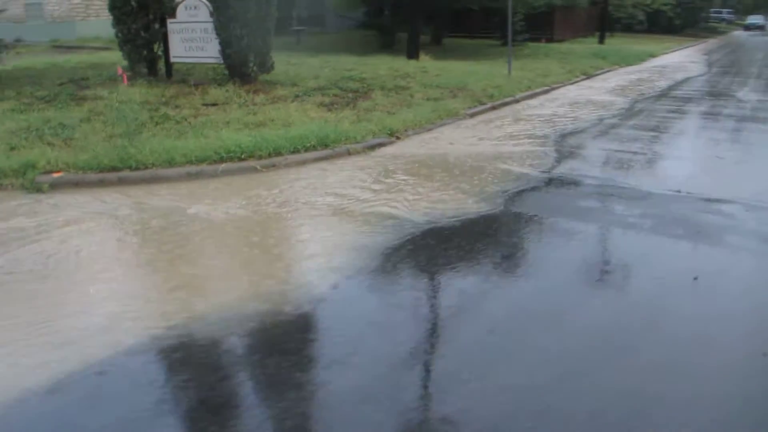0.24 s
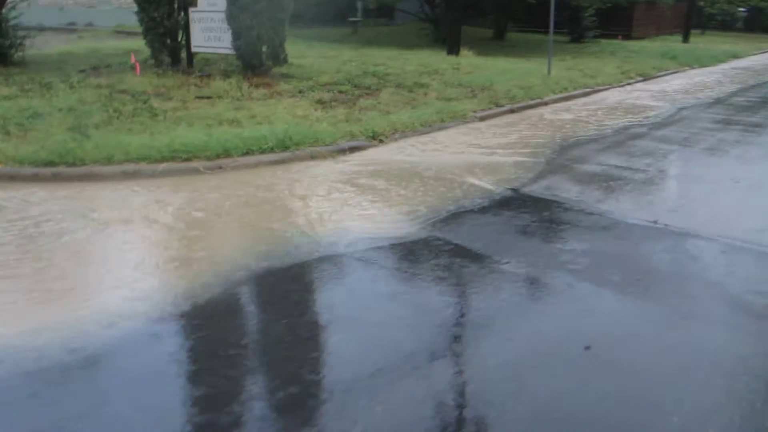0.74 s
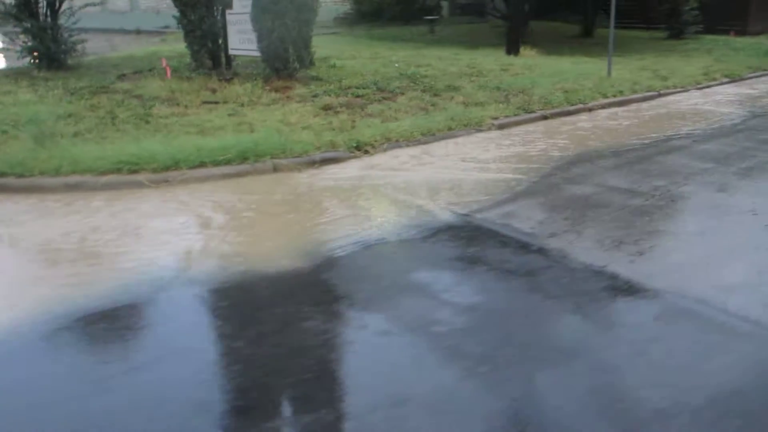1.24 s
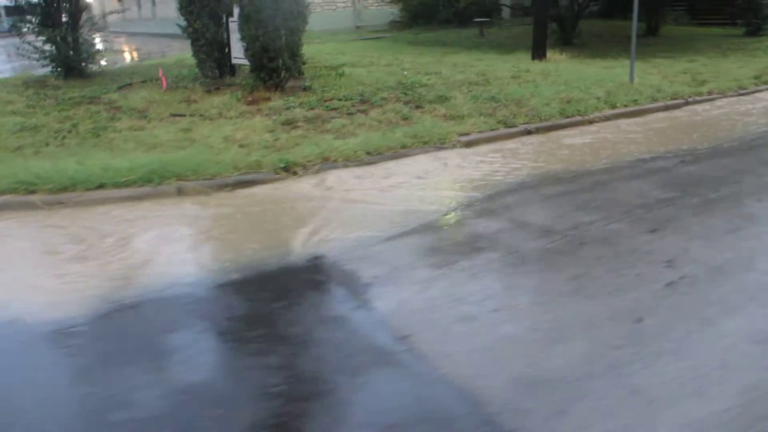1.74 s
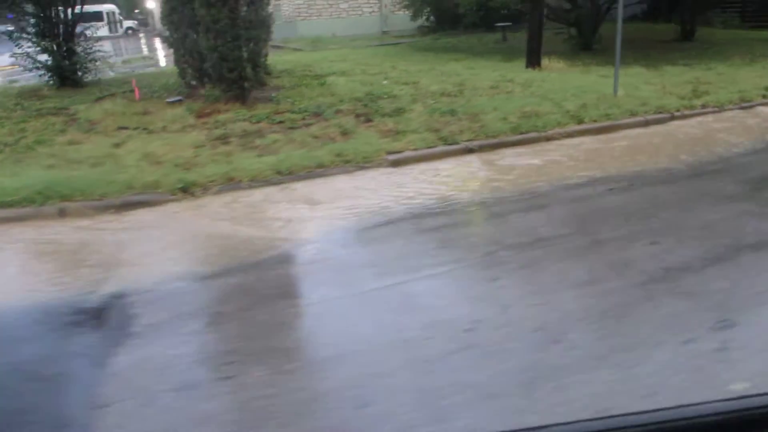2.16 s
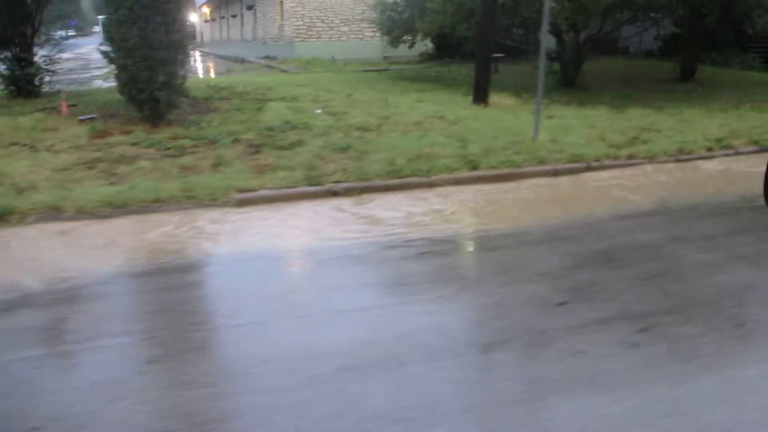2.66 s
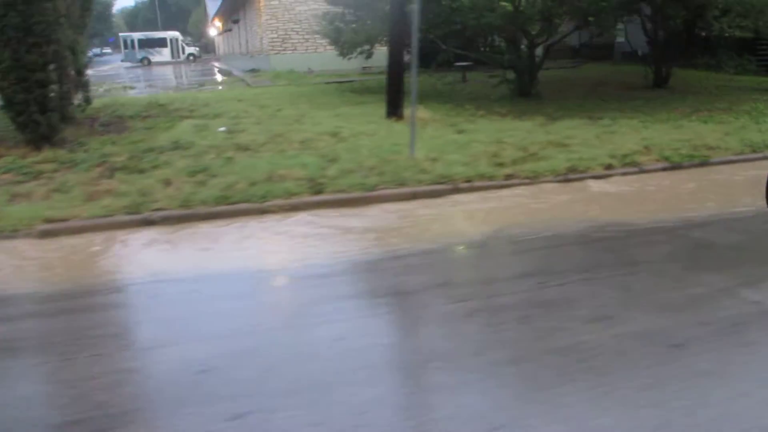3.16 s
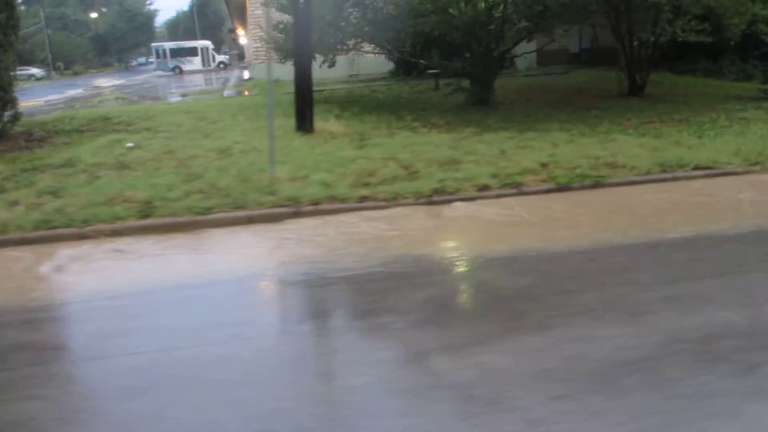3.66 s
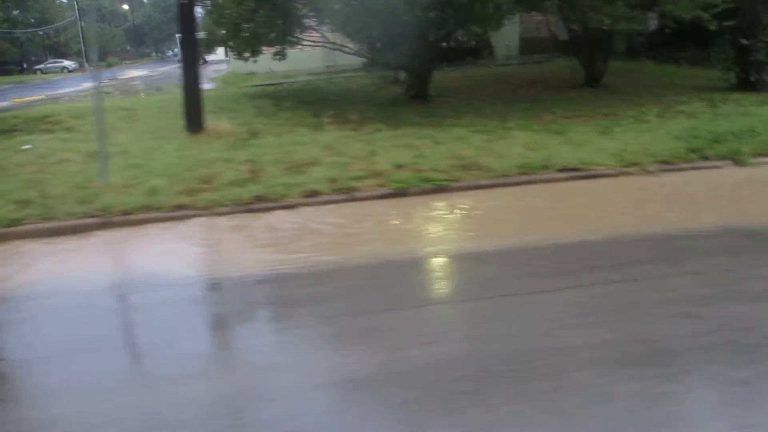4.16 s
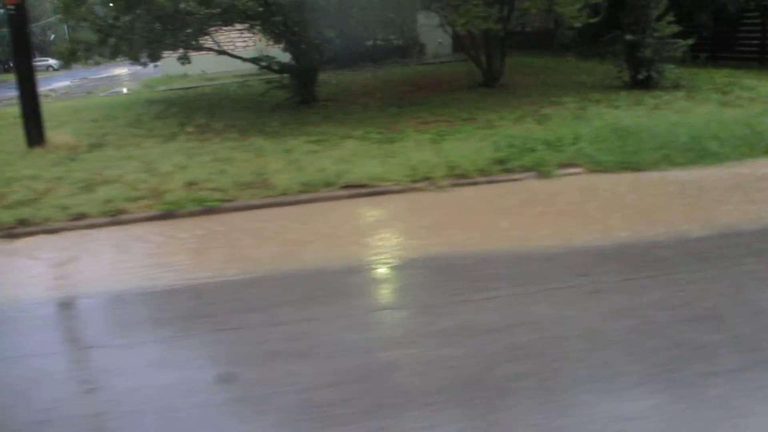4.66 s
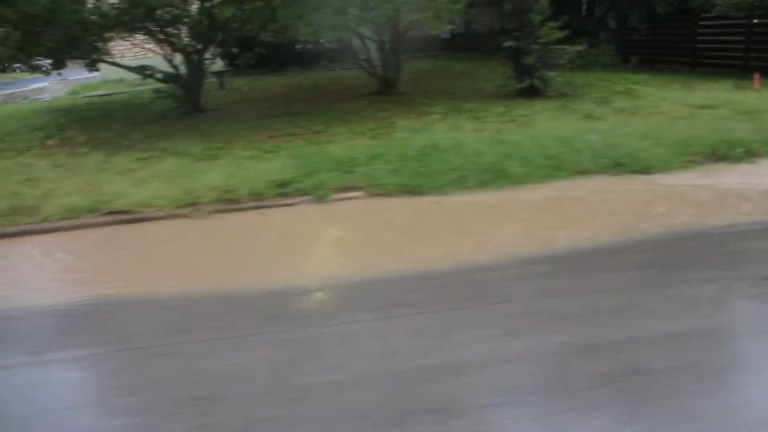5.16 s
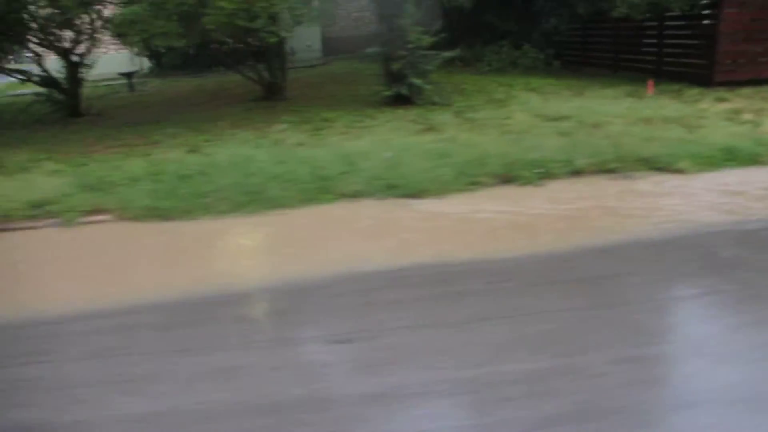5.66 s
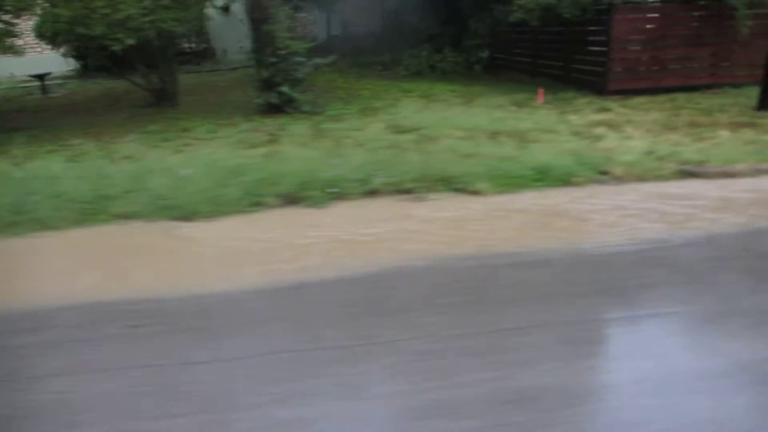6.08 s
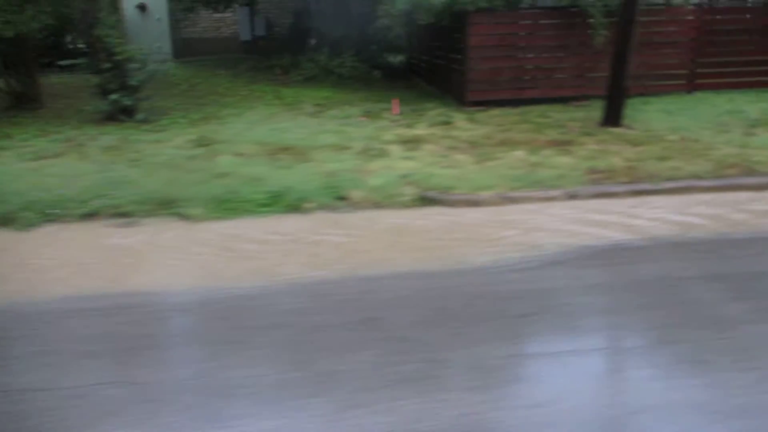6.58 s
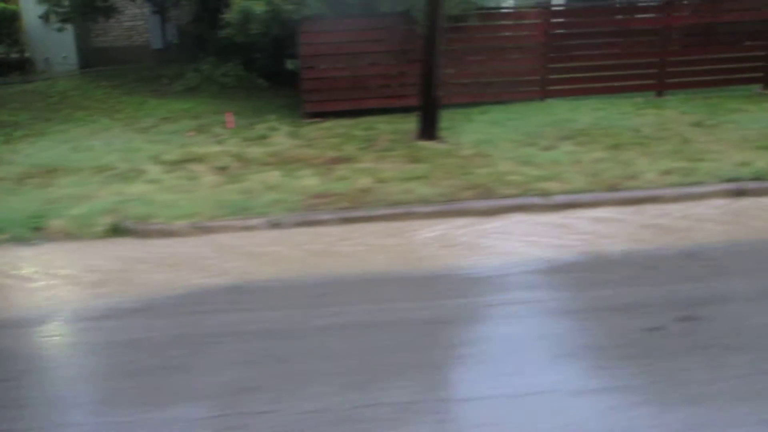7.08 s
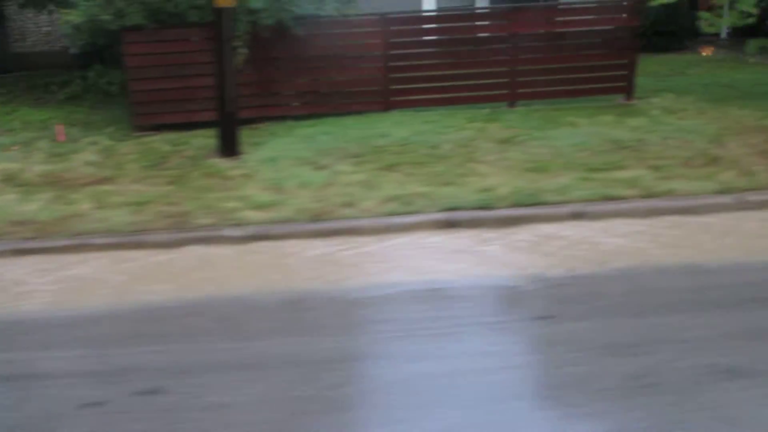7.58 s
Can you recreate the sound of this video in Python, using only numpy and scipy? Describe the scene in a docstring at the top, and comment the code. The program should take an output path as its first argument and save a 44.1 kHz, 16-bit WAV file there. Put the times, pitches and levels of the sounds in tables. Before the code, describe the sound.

Heard from inside a moving car in the rain, a low engine drone rises steadily over deep road rumble and the wash of shallow water under the tyres. Fine drops patter, with small ticks and splashes. Wipers knock softly at an even pace, bumps boom, and a hollow tap comes early. The engine eases briefly near the middle, pulls again, then drops quickly in pitch late on as the throttle lifts. The sound leans to the right.

```python
"""Inside a car driving along a flooded street in steady rain, heard by two microphone ports.
From the start the engine, a few sine tones and gas noise, rises in pitch, easing briefly near 3 s.
All along, noise makes the tyres' rumble and spray; short bursts make the rain, ticks and splashes.
The wipers knock at each turn from 0.18 s, bumps boom, and a tap on the trim comes at 0.74 s.
Heavy drops snap close by at 0.8 and 5.76 s; after 6 s the throttle lifts and the pitch falls."""
import sys
import numpy as np
from scipy import signal
from scipy.fft import rfft, irfft
from scipy.io import wavfile
from scipy.ndimage import uniform_filter1d

SR = 44100
rng = np.random.default_rng(int(sys.argv[2]) if len(sys.argv) > 2 else 0)


def generate_wav(sig):
    """Save sig (samples, or channels by samples) to the path in sys.argv[1] as 16-bit PCM at SR."""
    pcm = np.round(np.clip(np.atleast_2d(sig).T, -1, 1) * 32767).astype(np.int16)
    wavfile.write(sys.argv[1], SR, pcm)


N = 344862
TIME = np.arange(N) / SR

# The two microphone ports:
# (frequency [Hz], likeness of the two sides [0-1], left lead [rad], left minus right [dB])
PORTS = [(60, 1, 3.37, -8.5), (273, 0.99, 3.56, -9.5), (503, 0.81, 2.88, -8.5), (780, 0.87, 1.77, -11),
         (1400, 0.49, 2.6, -10.5), (2180, 0.58, 2.07, -8), (4000, 0.38, 0.42, -10), (8040, 1, 1.67, -13),
         (11500, 0.8, 1.22, -9.5), (15000, .5, 1.5, -8)]
# Slow changes of the road surface:
# (time [s], body rumble [dB], tread roar [dB], water wash [dB], fine spray [dB])
SURFACE = [(0, -27, -35.5, -40, -54.5), (1.8, -24.5, -34.5, -38.5, -56), (3.1, -24.5, -33.5, -39, -54.5),
           (4.4, -24, -35.5, -38, -57.5), (5.7, -22.5, -41.5, -37.5, -58), (6.45, -25.5, -37.5, -38.3, -57),
           (7.2, -27, -43, -37, -59), (7.82, -25, -40.5, -36, -55.8)]

# Larger drops on the glass: (time [s], level before the fade [dB], centre [Hz])
TICKS = [(.6213, -34, 9000), (1.2107, -26, 11500), (2.273, -32, 12000), (2.5833, -34, 9000),
         (2.6563, -27, 11000), (3.349, -31, 9000), (3.9722, -34, 9500), (4.5768, -37, 11000),
         (6.3367, -26.5, 9800)]
# Puddle water thrown at the underside:
# (time [s], level before the fade [dB], centre [Hz], time to fade by 60 dB [s])
SPLASHES = [(.163, -41, 1600, .06), (.286, -40.5, 1900, 0.052), (.842, -44.5, 1900, 0.23),
            (.93, -39, 1450, 0.15), (.953, -34, 2200, 0.031), (1.695, -35, 1350, 0.17),
            (1.762, -35, 1500, 0.038), (2.033, -30, 1220, .05), (2.544, -37, 2450, 0.028),
            (4.229, -31.5, 1650, .02)]
# Heavy drops beside the ports: (time [s], peak before the bass is cut [dB])
DROPS = [(.8001, -21), (5.7584, -12)]
# Tones that a heavy drop rings: (frequency [Hz], relative level [dB], time to fade by 60 dB [s])
DROP_TONES = [(1900, -2, 0.0041), (3220, 13, 0.0014), (5650, 1, 0.0022), (9000, -3.5, .0012),
              (11500, -0.5, .0012), (14800, -2.5, .0015)]

# Tone colour of the road rumble: (frequency [Hz], relative level [dB per Hz])
RUMBLE_COLOUR = [(8, -18), (25, 1.5), (45, -11.5), (70, -5.5), (100, -5), (150, -1.5), (205, -3.5),
                 (265, -4), (310, -15.5), (390, -21.5), (480, -27.5), (900, -39), (3000, -80)]
# Tone colour of the tread roar: (frequency [Hz], relative level [dB per Hz])
TREAD_COLOUR = [(150, -14), (270, -2.5), (335, 4), (410, 0), (480, -10.5), (700, -20), (3000, -66)]
# Tone colour of the parted water: (frequency [Hz], relative level [dB per Hz])
WASH_COLOUR = [(150, -4), (400, -0.5), (560, 0.5), (740, 0), (950, -2.5), (1250, -6), (1600, -12),
               (2200, -16), (3200, -24), (4300, -30.5), (7000, -30.5), (16000, -45)]
# Tone colour of the fine spray: (frequency [Hz], relative level [dB per Hz])
SPRAY_COLOUR = [(1500, -22), (4000, -4), (5500, -7), (7200, -5), (8800, 1.5), (10200, 2.5), (11800, -0.5),
                (13500, -5), (16000, -8)]

# Bumps in the road: (time [s], peak of the swell [dB], ring [Hz])
BUMPS = [(.038, -17, 137), (1.215, -14.5, 64), (3.12, -20, 259), (3.182, -20, 160), (5.637, -21, 144),
         (6.518, -16.5, 142.6), (7.315, -18, 125)]
# A hollow tap on the trim, with one bounce: (time [s], peak [dB])
TAPS = [(.7412, -22), (.7445, -19)]
# Tones that the tap rings: (frequency [Hz], relative level [dB], time to fade by 60 dB [s])
TAP_TONES = [(1160, -3, 0.015), (1380, 13, 0.025), (1600, -1, 0.018), (2500, -5, .012), (3500, -11, .01),
             (9000, -14, .002)]
# Strength of each wiper turn, one after the other: (peak of the swell [dB])
WIPER_TURNS = [-17.5, -24, -9.5, -9, -9.5, -18, -16, -15, -10.5, -14]

# Tone colour of the gas rush: (frequency [Hz], relative level [dB per Hz])
RUSH_COLOUR = [(100, -35), (260, 6.5), (400, 1.5), (520, -2.5), (800, -8.5), (1100, -11.5), (1500, -16.5),
               (2200, -29.5), (4000, -55), (8000, -64)]
# Resonances of the rush: (centre [Hz], width [Hz], lift [dB])
RUSH_PEAKS = [(707, 110, 5), (920, 130, 5.5), (1306, 73, 8.5)]
# Engine speed, given as the pitch of its drone: (time [s], pitch [Hz])
SPEED = [(0, 165), (.28, 180), (1.2, 192), (1.85, 198.6), (2.48, 221.5), (2.8, 218), (3.16, 204.5),
         (3.63, 225), (4.05, 224), (4.38, 233.5), (5.55, 247.8), (5.93, 250), (6.11, 233), (6.32, 184),
         (6.52, 165), (6.85, 160.5), (7.82, 145)]
# How hard the engine works; it labours, eases for a moment, pulls evenly, then coasts:
# (time [s], load [dB])
LOAD = [(1.68, -3), (1.9, 3.5), (2.8, 3.5), (3.02, -7.5), (3.25, -1), (6.05, 0), (6.42, -8.5), (7, -0.5)]
# Cabin resonances met by the firing note: (note [Hz], level before load [dB])
FIRING_BOOM = [(54.5, -29.5), (59, -37), (62, -31), (66.5, -40), (68.5, -28), (74, -24.5), (80.5, -27.5),
               (84.5, -44.5), (87.5, -36), (89, -26)]
# Level of the octave of that note: (note [Hz], level [dB])
OCTAVE_LEVEL = [(105, -34.5), (125, -33.5), (140, -30), (160, -38.5), (176, -32)]

RAIN_PER_S = 420  # average number of fine drops each second
# Extra ticks and splashes at random moments: how many of each kind per second, and their mean
# level before the fade (dB), mean centre (Hz) and time to fade by 60 dB (s)
STRAYS_PER_S = 1
STRAY_TICK_DB, STRAY_TICK_HZ = -40.5, 11000
STRAY_SPLASH_DB, STRAY_SPLASH_HZ, STRAY_SPLASH_T60 = -43, 1800, .05

# The wipers turn at a steady pace: first turn (s), time between turns (s), pitch of the knock (Hz)
FIRST_TURN_S, SWEEP_S, KNOCK_HZ = .181, .841, 152.5

DRONE_PER_FIRING = 2.8  # drone pitch divided by the firing note
FULL_SPEED_HZ = 248  # drone pitch that counts as full speed
# Level at full speed (dB; the drone's is before resonance and load), growth (dB per octave of speed)
DRONE_DB, DRONE_DB_PER_OCTAVE = -21.5, 15
RUSH_DB, RUSH_DB_PER_OCTAVE = -32, 32
# The drone meets a resonance near full speed: centre (Hz), width (Hz), lift (dB)
DRONE_PEAK_HZ, DRONE_PEAK_WIDTH_HZ, DRONE_PEAK_DB = 249, 12, 2
DRONE_LOAD_SHARE = 0.14  # part of the load's dB that the drone follows (0-1)

TREBLE_EDGE_HZ = 15950  # the treble is cut from here up


def amp(db):
    """Turns decibels into a plain multiplier."""
    return 10 ** (np.asarray(db) / 20)


def unit(x):
    """Scales a signal to an average strength (rms) of 1."""
    return x / np.sqrt(np.mean(x ** 2) + 1e-20)


def curves(rows):
    """Draws straight lines between the rows of a timed table, one curve per column."""
    seconds, *columns = np.transpose(rows)
    return [np.interp(TIME, seconds, column) for column in columns]


def read(rows, hz, axis=1):
    """Reads one column of a frequency table, with pitch spaced as the ear hears it."""
    table = np.transpose(rows)
    return np.interp(np.log(hz + 1), np.log(table[0] + 1), table[axis])


def peak(hz, centre_hz, width_hz, lift_db):
    """A resonance lifts what lies near its centre, in dB."""
    return lift_db / (1 + (2 * (hz - centre_hz) / width_hz) ** 2)


def add(mix, seconds, sound):
    """Mixes a short sound in at the given time."""
    start = max(round(seconds * SR), 0)
    part = mix[start:][:len(sound)]
    part += sound[:len(part)]


def wander(rate_hz):
    """Random drift of rms 1, made by keeping only the slow part of noise."""
    hz = np.fft.rfftfreq(N, 1 / SR)
    slow = np.exp(-(hz / rate_hz) ** 2)
    return unit(irfft(rfft(rng.standard_normal(N)) * slow, N))


def fade(t, t60):
    """Dying away: the level falls by 60 dB in t60 seconds."""
    return np.exp(-np.log(1000) * t / t60)


def noise(colour, patchy_db, size):
    """Noise of rms 1 with the dB spectrum colour(hz), stronger and weaker in drifting patches."""
    hz = np.fft.rfftfreq(size, 1 / SR)
    real, imag, patches = rng.standard_normal((3, N * 4 // size + 6, len(hz)))
    patches = uniform_filter1d(patches, size=8, axis=0)  # smooth over time
    patches = unit(uniform_filter1d(patches, size=12, axis=1))  # smooth over frequency
    frames = (real + 1j * imag) * amp(colour(hz) + patchy_db * patches)
    _, sound = signal.istft(frames.T, nperseg=size, noverlap=size * 3 // 4)
    return unit(sound[:N])


def burst(hz, octaves, t60):
    """A puff of noise around hz swells quickly and dies away."""
    t = TIME[:SR // 4]
    bins = np.fft.rfftfreq(len(t), 1 / SR)
    band = np.exp(-.5 * (np.log2((bins + 1) / hz) / octaves) ** 2)
    puff = unit(irfft(rfft(rng.standard_normal(len(t))) * band, len(t)))
    swell = 1 - np.exp(-50 * t / t60)
    return puff * swell * fade(t, t60)


def strays(db, hz, octaves, t60, spread_db=2.5):
    """Small bursts at random moments, each with its own size and pitch."""
    out = np.zeros(N)
    for when, size, pitch in rng.uniform(-1, 1, (round(STRAYS_PER_S * N / SR), 3)):
        seconds = (when + 1) / 2 * N / SR
        add(out, seconds, amp(db + spread_db * size) * burst(hz * (1 + .2 * pitch), octaves, t60))
    return out


def thuds(rows, rise, overtone_db):
    """Soft blows swell for rise seconds, then die away, as a low tone with a weaker one above."""
    out, t = np.zeros(N), TIME[:SR // 2]
    swell = t / rise * np.exp(1 - t / rise)
    for seconds, db, hz in rows:
        ring = np.sin(2 * np.pi * hz * t)
        ring = ring + amp(overtone_db) * np.sin(2 * np.pi * 1.55 * hz * t)
        add(out, seconds, amp(db) * swell * ring)
    return out


def struck(rows, tones):
    """Each blow sets the same few tones ringing; each tone fades at its own pace."""
    out, t = np.zeros(N), TIME[:SR // 10]
    ring = sum(amp(db) * fade(t, t60) * np.sin(2 * np.pi * hz * t) for hz, db, t60 in tones)
    for seconds, db in rows:
        add(out, seconds, amp(db) * ring / abs(ring).max())
    return out


def revs():
    """Engine speed in octaves from full speed (below it is negative)."""
    return np.log2(curves(SPEED)[0] / FULL_SPEED_HZ)


def rain(level_db=-5, count=12):
    """Many fine drops on the glass, a few larger than the rest; their level follows the spray's."""
    chance, spot = rng.random(N), rng.integers(0, count, N)
    size = np.minimum(rng.exponential(1, N), 4)
    hits = (chance < RAIN_PER_S / SR) * amp(4.4 * size)
    patter = np.zeros(N)
    for k, hz in enumerate(np.geomspace(7000, 11000, count)):  # each spot has its own pitch
        patter += signal.oaconvolve(hits * (spot == k), burst(hz, .4, .005))[:N]
    spray_db = curves(SURFACE)[-1]
    return amp(level_db + spray_db) * unit(patter)


def water(tick_t60=0.0042, tick_octaves=0.34, splash_octaves=0.55):
    """Larger drops tick on the glass as short high bursts; puddles splash lower and longer."""
    out = strays(STRAY_TICK_DB, STRAY_TICK_HZ, tick_octaves, tick_t60)
    out += strays(STRAY_SPLASH_DB, STRAY_SPLASH_HZ, splash_octaves, STRAY_SPLASH_T60)
    for seconds, db, hz in TICKS:
        add(out, seconds, amp(db) * burst(hz, tick_octaves, tick_t60))
    for seconds, db, hz, t60 in SPLASHES:
        add(out, seconds, amp(db) * burst(hz, splash_octaves, t60))
    return out


def drops(left_db=4.0, low_hz=1500):
    """Heavy drops snap beside the ports, thin in the bass, louder and a little earlier on the left."""
    bass_cut = signal.butter(2, low_hz, "highpass", fs=SR, output="sos")
    snap = signal.sosfilt(bass_cut, struck(DROPS, DROP_TONES))
    left = amp(left_db) * np.roll(snap, -2)  # two samples earlier
    return np.array([left, snap])


def tyres():
    """Road rumble through the body, tread roar, the wash of parted water and flickering fine spray."""
    rumble_db, tread_db, wash_db, spray_db = curves(SURFACE)
    wash_db = wash_db + 0.42 * wander(13)
    spray_db = spray_db + 0.53 * wander(60)
    rumble = amp(rumble_db) * noise(lambda hz: read(RUMBLE_COLOUR, hz), patchy_db=.5, size=4096)
    tread = amp(tread_db) * noise(lambda hz: read(TREAD_COLOUR, hz), patchy_db=1.16, size=2048)
    wash = amp(wash_db) * noise(lambda hz: read(WASH_COLOUR, hz), patchy_db=1.28, size=1024)
    spray = amp(spray_db) * noise(lambda hz: read(SPRAY_COLOUR, hz), patchy_db=2.2, size=512)
    return rumble + tread + wash + spray


def bumps():
    """Bumps in the road boom briefly in the cabin."""
    return thuds(BUMPS, rise=0.013, overtone_db=-14)


def trim_tap():
    """A hollow tap and its bounce set the trim ringing."""
    return struck(TAPS, TAP_TONES)


def wipers():
    """One soft knock at each turn, evenly spaced in time."""
    turns = [(FIRST_TURN_S + k * SWEEP_S, db, KNOCK_HZ) for k, db in enumerate(WIPER_TURNS)]
    return thuds(turns, rise=0.007, overtone_db=-13.5)


def gas_rush():
    """Gas noise in fixed resonances, swelling with engine speed."""
    def colour(hz):
        return read(RUSH_COLOUR, hz) + sum(peak(hz, *row) for row in RUSH_PEAKS)
    level_db = RUSH_DB + RUSH_DB_PER_OCTAVE * revs()
    return amp(level_db) * noise(colour, patchy_db=0.5, size=2048)


def engine(flutter_db=1.13, octave_flutter_db=1.5):
    """The firing note, its octave and a drone geared to the same shaft, so all glide together."""
    drone_hz, load_db = curves(SPEED)[0], curves(LOAD)[0]
    unsteady_hz = drone_hz * (1 + .002 * wander(15))
    drone_angle = 2 * np.pi * np.cumsum(unsteady_hz) / SR
    firing_angle, firing_hz = drone_angle / DRONE_PER_FIRING, drone_hz / DRONE_PER_FIRING

    drone_db = DRONE_DB + DRONE_DB_PER_OCTAVE * revs() + DRONE_LOAD_SHARE * load_db
    drone_db += peak(drone_hz, DRONE_PEAK_HZ, DRONE_PEAK_WIDTH_HZ, DRONE_PEAK_DB)
    firing_db = read(FIRING_BOOM, firing_hz) + load_db
    octave_db = read(OCTAVE_LEVEL, 2 * firing_hz)

    tones = [(drone_angle, drone_db, flutter_db),
             (firing_angle, firing_db, flutter_db),
             (2 * firing_angle, octave_db, octave_flutter_db)]
    out = np.zeros(N)
    for angle, db, depth_db in tones:
        out += amp(db + depth_db * wander(11.4)) * np.sin(angle)
    return np.sqrt(2) * out  # levels are rms, so each sine peaks 3 dB higher


def ports(sound, diffuse):
    """The right port faces the sound; the left is weaker, turned in phase and partly unrelated."""
    hz = np.fft.rfftfreq(N, 1 / SR)
    same = np.clip(read(PORTS, hz, axis=1), 0, 1)
    turn = np.exp(1j * read(PORTS, hz, axis=2))
    left = same * turn * rfft(sound) + np.sqrt(1 - same ** 2) * rfft(diffuse)
    left = left * amp(read(PORTS, hz, axis=3))
    return np.array([irfft(left, N), sound])


def outside():
    """One random version of the rain, water, tyres and gas rush together."""
    return rain() + water() + tyres() + gas_rush()


def scene():
    """Cabin sounds and the wet road at the two ports, with the heavy drops on top."""
    cabin = bumps() + trim_tap() + wipers() + engine()
    direct, diffuse = outside(), outside()
    return ports(cabin + direct, diffuse) + drops()


def record(dry):
    """Softens both ends over 4 ms and cuts the highest treble, as a recorder's band limit does."""
    ends = np.minimum(1, np.minimum(TIME, TIME[::-1]) / .004)
    treble_cut = signal.firwin(511, TREBLE_EDGE_HZ, window=("kaiser", 9), fs=SR)
    return signal.oaconvolve(dry * ends, treble_cut[None], "same")


dry = scene()
out = record(dry)
generate_wav(out)
```